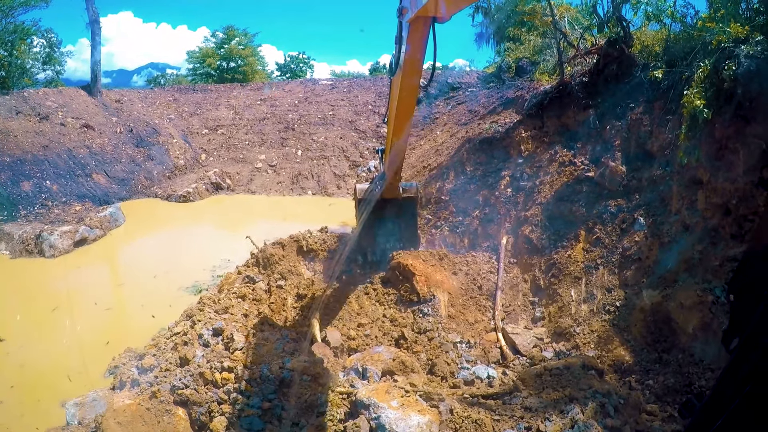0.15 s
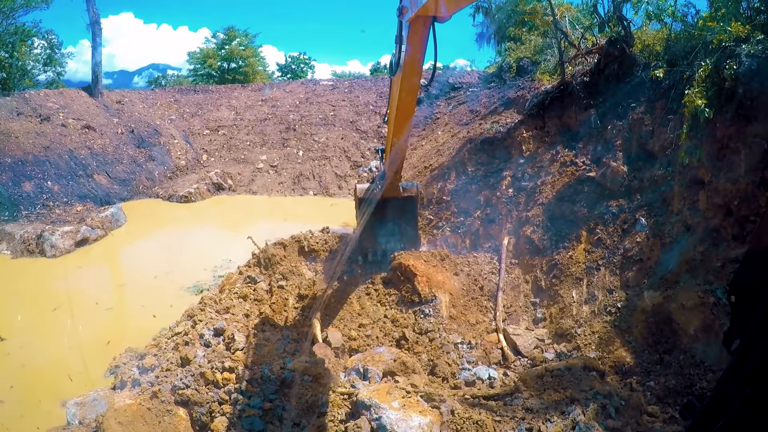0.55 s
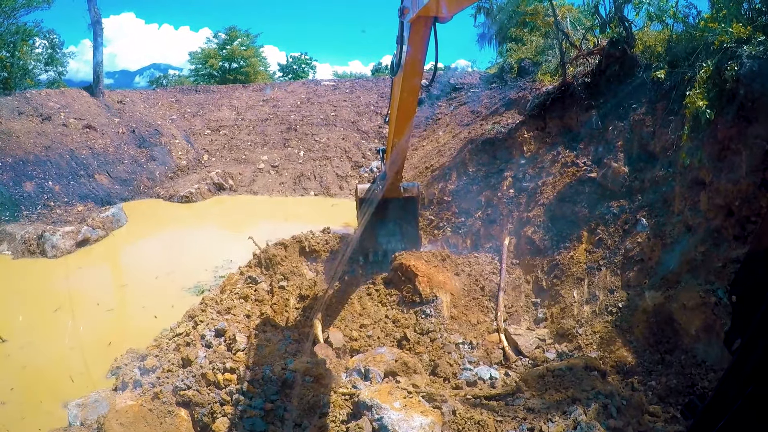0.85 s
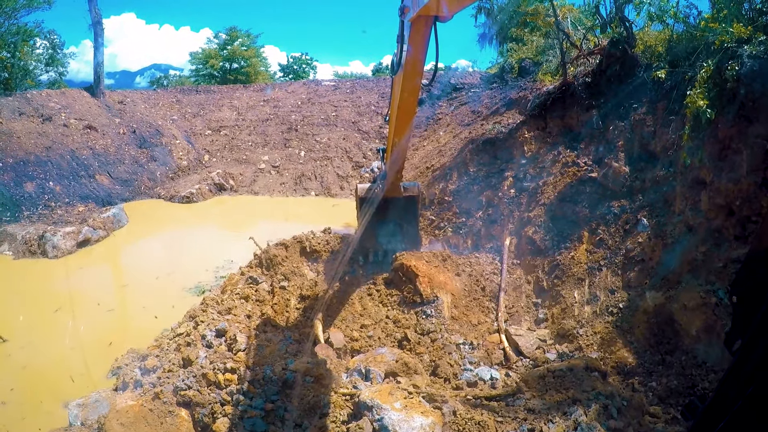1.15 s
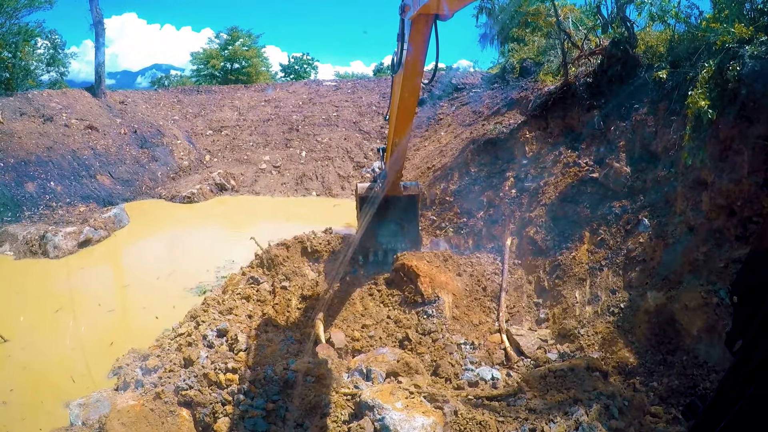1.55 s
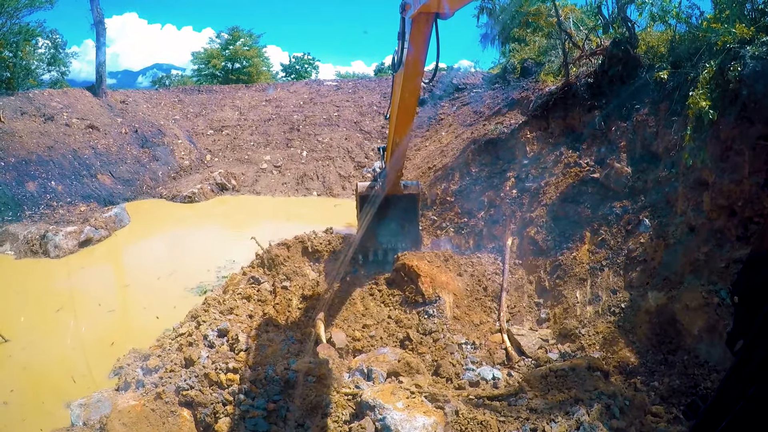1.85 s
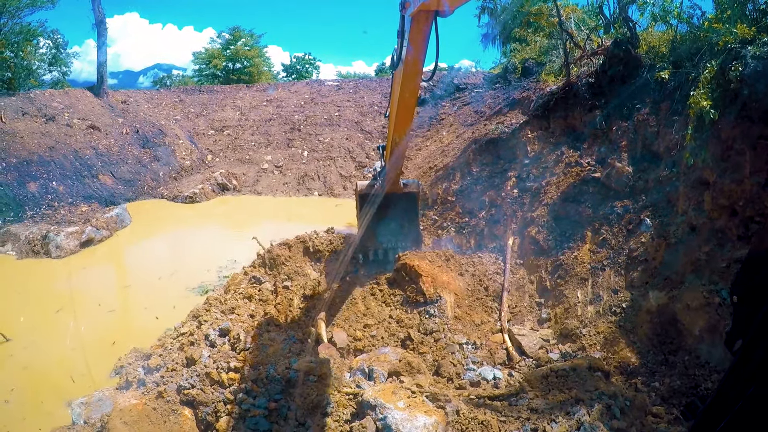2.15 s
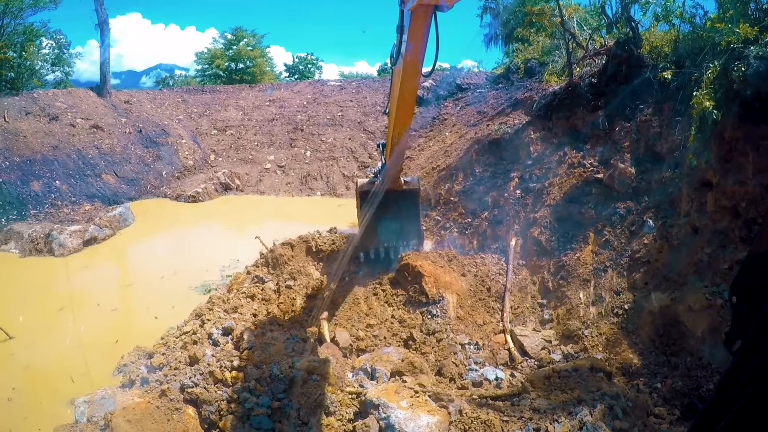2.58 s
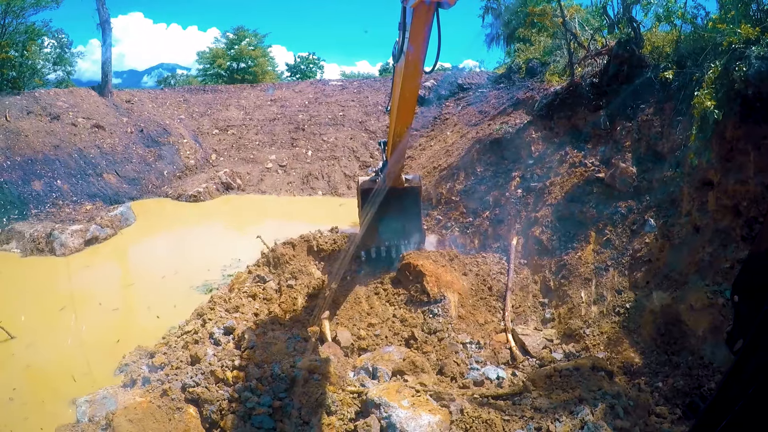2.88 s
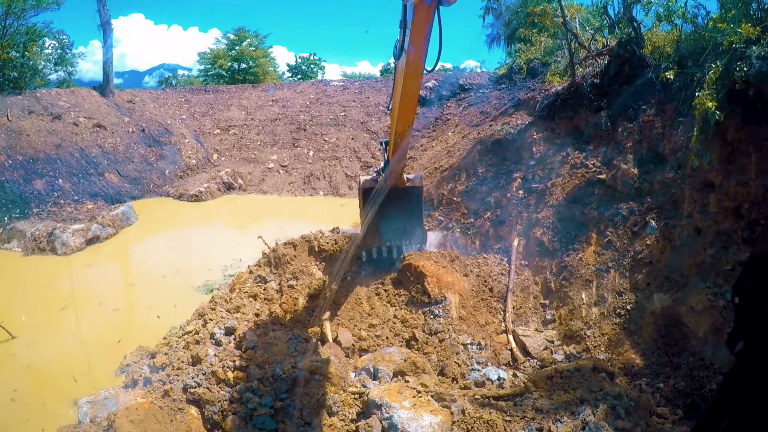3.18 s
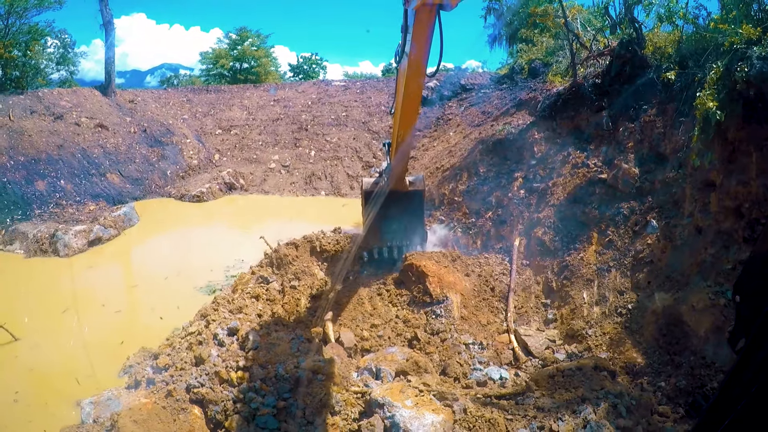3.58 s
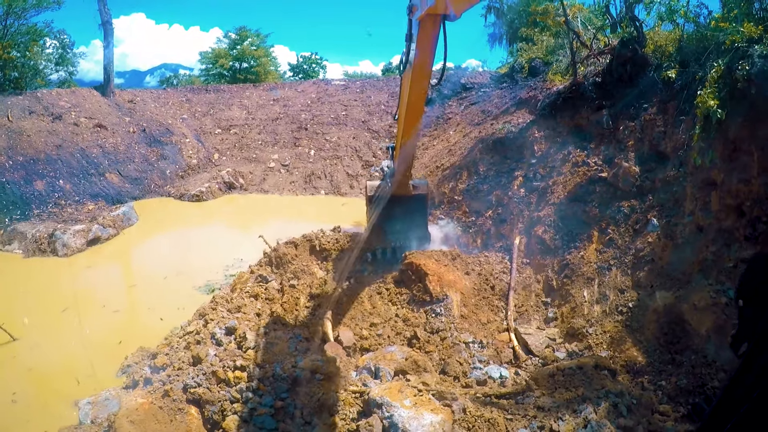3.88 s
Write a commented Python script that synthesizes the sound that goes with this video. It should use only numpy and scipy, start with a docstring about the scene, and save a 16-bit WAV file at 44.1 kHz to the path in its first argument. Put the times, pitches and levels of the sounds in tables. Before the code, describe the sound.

An excavator digs rocky ground outdoors, heard through the two ports of a camera clamped to its cab, so the bass is heavy and phasey. It opens with a deep sway and boom and a quick flurry of dry grit rattles in the first 0.3 s; a very faint thin squeal follows around 0.4-0.6 s. The boom eases while a low diesel hum, strongest near 0.9 s, and a hydraulic pump tone rise, holding to about 2.2 s. From 1.1 s the frame booms again in lumpy, overlapping tugs, with growl, faint hiss and sparse ticks. Scraping grows from 2.2 s; a soft steel knock lands at 2.8 s. The pump fades after 3.2 s. At 3.6 s a cluster of dull metallic knocks begins, climaxing in a very loud bang at 3.78 s with scrape and sharp grit. A tiny squeal and settling stones follow until the cut at 4 s.

```python
"""A deep sway and boom with a rattle of grit come first, then the engine hum rises: a crawler excavator digs
rocky ground, heard at close range through the two microphone ports of a camera clamped to its cab.
Filtered noise makes the frame boom and judder as the bucket drags, nearly in opposition at the ports through
much of the bass. Decaying noise and ticks rattle as grit close by; ringing steel modes knock on rock.
Behind them, the diesel and the hydraulic pump hum on multiples of one shaft, with two thin squeals."""
import sys
import numpy as np
from scipy.fft import rfft, irfft, next_fast_len
from scipy.io import wavfile
from scipy.ndimage import uniform_filter1d, minimum_filter1d, map_coordinates

SR = 44100
rng = np.random.default_rng(int(sys.argv[2]) if len(sys.argv) > 2 else 0)


def pcm_store(signal):
    """Save signal as 16-bit PCM."""
    levels = np.round(np.clip(np.atleast_2d(signal), -1, 1) * 32767)
    wavfile.write(sys.argv[1], SR, levels.astype(np.int16).T)


N = 177546

# Bucket teeth catching and letting go: peak_s, length_s, boom_db, scrape_db
TUG_SWELLS = [(0, 0.22, -21, -62.5), (0.387, 0.2, -26, -58.5), (1.125, 0.13, -18.5, -49.5),
              (1.282, 0.21, -21.5, -51.5), (1.545, 0.25, -27.5, -57), (1.905, 0.32, -23.5, -52),
              (2.246, 0.2, -19.5, -45), (2.709, 0.32, -23, -48.5), (2.841, 0.11, -19.5, -52),
              (3.093, 0.19, -19.5, -47.5), (3.52, 0.15, -32, -46), (3.623, 0.11, -22.5, -43.5),
              (3.721, 0.096, -26, -40), (3.777, 0.071, -20, -33.5)]
TUG_RISE = 0.43  # share of a tug's length before its peak
BOOM_REST_DB, SCRAPE_REST_DB = -30.5, -66.5  # between tugs
TUG_GROWL_DB = -16  # growl swelled by a tug, relative to the boom
# How hard the bucket drags: time_s, effort_db
DRAG_EFFORT = [(0, 0.5), (.36, -3), (1.12, 1.5), (1.5, -1.5), (1.9, 0.5), (2.5, -1.5), (3.36, -1.5),
               (3.6, 3), (3.785, 9.5), (3.93, -2), (4.03, 2)]
# Growl, judder and hiss, one row each: level_db at effort 0, growth_db per dB of effort
FRAME_LAYERS = [(-39, 1.41), (-49, 1.38), (-61.5, 1.5)]
# Frame resonances: pitch_hz, width_hz of one pass, level_db of one pass (the filter passes twice)
FRAME_MODES = [(89.95, 9.1, 0.5), (107.26, 8.1, -0.5), (120.7, 13.5, -1.5), (129.1, 16, -16.5),
               (81.3, 31, -9.5)]
# The cab rocking on its mounts: time_s, level_db
ROCKING_LEVEL = [(0, -14), (.3, -19.5), (1.3, -23), (2.5, -20), (3.0, -25), (3.55, -17.5), (3.75, -18.5),
                 (4.03, -24)]
# Noise colours, before scaling to rms 1: pitch_hz, density_db (relative, per Hz)
ROCKING_COLOUR = [(8, -25.5), (15, -7.5), (26, -2), (38, -2.5), (48, -20.5), (70, -8.5), (85, -25),
                  (160, -120)]
GROWL_COLOUR = [(88, -44.5), (150, 0), (226, -6.5), (264, -3.5), (351, -7), (397, -10), (420, -15),
                (450, -19.5), (580, -24.5), (990, -120)]
JUDDER_COLOUR = [(250, -41), (420, 1), (489, -4), (979, -15), (1080, -12), (1250, -16), (2600, -27),
                 (3380, -71.5), (5720, -120)]
HISS_COLOUR = [(1290, -37), (2200, -2), (2420, 1.5), (2520, -6.5), (2830, -2), (4790, -11), (6190, -5.5),
               (7000, -4), (8890, -16.5), (11600, -28.5), (19600, -120)]
RATTLE_COLOUR = [(1350, -19.5), (2300, -0.5), (3100, -5.5), (3400, -2), (3850, -5.5), (4800, -8.5),
                 (5140, -5), (6780, -1), (8890, -15), (11600, -25.5), (19600, -120)]
RATTLE_LOW_COLOUR = [(260, -35), (450, -0.5), (557, -2), (937, -7), (1290, -8), (1750, -9.5), (2600, -17.5),
                     (3380, -43.5), (5720, -120)]

# Bucket blows on rock: start_s, peak_db (nominal), upper_modes_db (relative)
BLOWS = [(2.806, -21.5, -16), (3.599, -19, -20), (3.612, -12.5, -21), (3.675, -17, -14), (3.716, -26, -8),
         (3.778, -3.5, -19), (3.797, -11, -24)]
# Modes of the boom and bucket steel: pitch_hz, level_db (relative), t60_s
STEEL_MODES = [(141, 1.5, 0.2), (192, -4.5, 0.29), (261, 12, 0.032), (327.3, 0.5, 0.17), (475, 5.5, 0.1),
               (694, 1, 0.064), (769.6, 4.5, 0.081), (901, -0.5, 0.16), (1040, -5.5, 0.069),
               (1195, 0.5, 0.13), (1305, -3.5, 0.084), (1426, 4, 0.096), (1560, -8.5, 0.03),
               (2055, -13, 0.065)]
RATTLE_CREST_DB, KNOCK_CREST_DB = 11, 12  # peak of a rattle over its rms, of a knock over one mode

# Grit rattles close by: start_s, peak_db (nominal), low_part_db (relative), t60_s,
# chip_hz of the loudest chip, chip_db (relative)
RATTLES = [(0.019, -37, -7.5, 0.1, 6160, 2.5), (0.053, -30.5, 2, 0.092, 7300, -2),
           (0.078, -42, 5.5, 0.15, 2300, 7), (0.0775, -46, -6, 0.13, 3530, 14),
           (0.1482, -37.5, 9, 0.11, 3180, 0), (0.252, -39, -5, 0.13, 2330, 0),
           (0.2726, -32, 5, 0.11, 7180, 2.5), (0.309, -43.5, 10, 0.14, 1298, 10.5),
           (0.575, -37.5, 2.5, 0.16, 2330, -11), (0.8828, -43, 2, 0.07, 5770, 0),
           (1.099, -40, -2.5, 0.084, 6070, -7), (1.938, -45.5, 7, 0.12, 7000, 0),
           (2.144, -55.5, 0, 0.16, 6850, 12), (2.279, -39.5, -2, 0.076, 6840, -6),
           (2.4323, -48, -6.5, 0.13, 2150, -1), (2.4894, -44.5, 6, 0.11, 6460, -12),
           (2.547, -46, -2, 0.036, 6070, 2), (2.671, -46.5, -2, 0.075, 3490, -15),
           (2.742, -38.5, -4.5, 0.13, 7350, -1), (2.967, -40, -0.5, 0.1, 7450, -2),
           (3.141, -42.5, -8, 0.1, 3320, -6.5), (3.2755, -39, 1.5, 0.072, 7400, -3),
           (3.512, -37.5, -5, 0.062, 7470, -5), (3.572, -48.5, 3.5, 0.126, 7190, 7),
           (3.5955, -37, 11.5, 0.083, 2045, 12), (3.651, -35, -21, 0.063, 6400, -8),
           (3.663, -43.5, 7, 0.35, 1353, 15.5), (3.6987, -50.5, 9, 0.043, 1280, 6),
           (3.757, -25.5, 1, 0.14, 7110, -6), (3.8433, -39, 3, 0.37, 7450, -11),
           (3.907, -39, 5.5, 0.036, 1290, 9), (3.9465, -34, -18, 0.054, 2380, 4.5),
           (3.959, -35.5, 3.5, 0.1, 7500, 2), (4.006, -42.5, 4.5, 0.067, 2350, 10)]
# Chips ringing in a rattle: pitch_hz, width_hz of one pass, level_db (relative)
CHIP_MODES = [(1300, 730, -11), (2210, 490, -1), (3620, 1100, -3.5), (4500, 550, -3.5), (6040, 540, 1.5),
              (7550, 490, 1.5)]
RATTLE_ATTACK_S, CHIP_Q = .0018, 6  # rise; chip pitch over its width
CHIP_FADES_DB, LOW_LINGERS_DB = 30, 12.5  # over one t60: extra fall of a chip's ring, lesser fall of the low part
CRACK_DB = 0.5  # nominal tick level over the rattle's gain
TICK_COLOUR = [(2000, -25), (7000, 7), (10000, 0), (13500, -6.5), (16000, -17.0)]  # pitch_hz, gain_db

# Engine speed: time_s, shaft_turns_per_s
SHAFT_SPEED = [(0, 29.25), (.6, 29.17), (1.4, 29.33), (2.2, 29.36), (3.2, 29.3), (4.03, 29.28)]
# Firing hum: time_s, level_db
FIRING_LEVEL = [(0, -60.5), (.2, -22), (.45, -27.5), (.93, -14), (1.31, -26.5), (1.68, -17.5), (2.15, -20),
                (2.41, -29.5), (3.0, -21.5), (3.2, -29), (3.42, -23.5), (3.64, -21.5), (4.03, -35.5)]
# Octave of the firing hum: time_s, level_db
OCTAVE_LEVEL = [(0, -36), (.4, -43.5), (1.0, -31), (1.5, -19), (1.8, -34), (2.1, -27.5), (2.6, -30.5),
                (3.2, -22), (3.6, -32.5), (4.03, -24)]
# Hydraulic pressure: time_s, pressure_db
HYDRAULIC_PRESSURE = [(0, -19.5), (.68, -9), (.86, 0.5), (1.2, 3.5), (1.4, -1), (1.7, 0), (2.2, 0.5),
                      (2.3, -11), (2.67, -4.5), (3.0, -6.5), (3.3, -15.5), (4.03, -22.5)]
# Other shaft multiples: multiple, level_db at pressure 0, port_phase_rad
SHAFT_ORDERS = [(1, -34.5, 10), (12, -44, -1.43)]
# Pump overtones from the second up: level_db (relative), port_phase_rad
PUMP_OVERTONES = [(-4.5, -0.5), (-0.5, 4), (2, 1.44), (-7, 2), (-2.5, -3.5), (-12, -3), (-18, -1)]
PISTONS = 9
PULSE_DB, WHINE_DB = -31.5, -56  # at pressure 0
PULSE_GROWS, WHINE_GROWS, GROWL_GROWS = 0.66, 1.02, 0.11  # dB per dB of pressure
ORDER_GROWS = 0.26  # the same for the twelfth shaft order, less for lower ones

# Thin squeals: start_s, end_s, pitch_hz, peak_db (nominal)
SQUEALS = [(0.364, 0.588, 6100, -68.5), (3.826, 3.89, 5350, -50)]

# Paths to the microphone ports: pitch_hz, likeness (0-1), right_phase_rad, left_over_right_db
SHARED_PATH = [(17, .89, .6, -6), (29, .4, -1.1, -3), (42, .2, -.5, -5), (75, .85, -2.3, -3),
               (92, .99, -2.5, -2.3), (125, .99, -2.72, -2.6), (180, .92, -2.8, -4), (238, .7, -3, -3),
               (326, .8, -4.5, -2), (435, 0.6, -6.5, -1), (610, 0.36, -4, -5), (1640, 0.44, -4, 0.5),
               (2100, 0.3, -8.5, 0), (5800, .45, -5, -2), (7000, 0.2, -1, 0.5), (9100, 0.3, 0.5, -1.5),
               (12000, .5, -5.5, 0.5)]
CLAMP_PATH = [(393, 0.92, -2, 1), (860, 0.95, -3, -0.5), (1510, 0.94, -2.5, 0.5), (1900, 0.5, -1.5, 0)]  # scraping, borne by the steel
KNOCK_PATH = [(130, 0.85, -4, -4), (300, 0.91, -1.9, -2.5), (900, 0.89, -3, 1)]
LIMIT, LIMIT_HOLD_S, TOP_HZ = .92, .012, 15800


def frame(boom_gain):
    """Noise-driven shaking of cab and frame; teeth catching on stones make it lumpy."""
    effort_db = curves(DRAG_EFFORT)[0]
    growl_gain, judder_gain, hiss_gain = (amp(db + grows * effort_db) for db, grows in FRAME_LAYERS)
    catch = wobble(21.98)
    boom = boom_gain * amp(0.9 * wobble(15)) * evened(resonant(FRAME_MODES))

    drag_growl = growl_gain * amp(GROWL_GROWS * curves(HYDRAULIC_PRESSURE)[0])
    tug_growl = boom_gain * amp(TUG_GROWL_DB)
    growl = np.hypot(drag_growl, tug_growl) * amp(1.3 * catch) * noise(GROWL_COLOUR)
    judder = judder_gain * amp(1.3 * catch + 0.74 * wobble(70)) * noise(JUDDER_COLOUR)

    ringing = amp(-15.5 + 1.5 * wobble(12)) * resonant(CHIP_MODES[-2:])
    hiss = hiss_gain * amp(0.78 * catch + 0.47 * wobble(5.7)) * (noise(HISS_COLOUR) + ringing)
    return rocking() + boom + growl + judder + hiss


def tugs():
    """Boom and scrape gains: a resting power plus one smooth swell for each tug."""
    t = np.arange(N) / SR
    power = amp([[2 * BOOM_REST_DB], [2 * SCRAPE_REST_DB]])
    for peak_s, length, *db in TUG_SWELLS:
        side = length * np.where(t < peak_s, TUG_RISE, 1 - TUG_RISE)
        power = power + amp(db)[:, None] ** 2 * np.exp(-2 * ((t - peak_s) / side) ** 2)
    return np.sqrt(power)


def rocking():
    """The cab's slow swing on its mounts, as low noise."""
    return amp(curves(ROCKING_LEVEL)[0]) * evened(noise(ROCKING_COLOUR))


def scrape(scrape_gain):
    """Dragging feeds uneven noise into the upper steel modes; the wider the mode, the shorter it rings."""
    # half the level, as the filter passes twice
    upper = [(hz, 9 / t60, db / 2) for hz, db, t60 in STEEL_MODES[4:]]
    return scrape_gain * amp(1.9 * wobble(45) + 2.0 * wobble(120)) * resonant(upper)


def knocks():
    """Each blow rings the steel modes with new strengths and slightly shifted pitches."""
    out = np.zeros((2, N + SR))
    t = np.arange(SR // 3) / SR
    hz, level_db, t60 = np.array(STEEL_MODES).T[:, :, None]
    attack = 1 - np.exp(-t / .002)
    for start, db, upper_db in BLOWS:
        strength, shift, phase = rng.standard_normal((3, 2, len(hz), 1))
        mode_db = db - KNOCK_CREST_DB + level_db + upper_db * (hz > 400) + 1.5 * strength
        gain = amp(mode_db - 60 * t / t60)
        ring = gain * np.sin(2 * np.pi * hz * (1 + .015 * shift) * t + .3 * phase) * attack
        out[:, round(start * SR):][:, :len(t)] += ring.sum(axis=1)
    return out[:, :N]


def grit():
    """Each rattle starts sharply, rings one chip loudest and dies in uneven grains; ticks fall throughout."""
    t = np.arange(SR // 3) / SR
    high, low = np.zeros((2, N + SR))
    ring = np.zeros((2, N + SR))
    waver = rng.standard_normal((len(RATTLES), 2, 2, SR // 50))
    attack = 1 - np.exp(-t / RATTLE_ATTACK_S)
    for (start, db, low_db, t60, chip_hz, chip_db), knots in zip(RATTLES, waver):
        fade = amp(db - RATTLE_CREST_DB - 60 * (t / t60) ** 1.44) * attack
        at = slice(round(start * SR), round(start * SR) + len(t))
        high[at] += fade
        low[at] += fade * amp(low_db + LOW_LINGERS_DB * t / t60)
        # slow random cosine and sine parts make a narrow band around the chip's pitch
        knot_at = [t * chip_hz / CHIP_Q + 2]
        c, q = [[map_coordinates(k, knot_at) for k in part] for part in knots]
        turn = 2 * np.pi * chip_hz * t
        chip_gain = fade * amp(chip_db - CHIP_FADES_DB * t / t60)
        ring[:, at] += chip_gain * (c * np.cos(turn) + q * np.sin(turn))
    high, low, ring = high[:N], low[:N], ring[:, :N]

    # each chip size rings on its own; big chips go with the low part
    chips = np.zeros((2, N))
    for hz, width, db in CHIP_MODES:
        part = low if hz < 4000 else high
        chips += amp(db - 13.0 + 2.2 * wobble(40)) * part * resonant([(hz, width, 0)])
    grain = amp(0.66 * wobble(260) + 1.1 * wobble(90))
    rattle = grain * (high * noise(RATTLE_COLOUR) + chips + ring + low * noise(RATTLE_LOW_COLOUR))
    return rattle + ticks(high)


def ticks(rattle_gain):
    """Random single impulses in clumps, stronger inside a rattle, coloured bright."""
    chance, size = rng.random((2, N))
    ticks_per_sample = 150 * amp(7 * wobble(7)) / SR
    gain = (amp(-52) + amp(CRACK_DB) * rattle_gain) * amp(-2 * np.log(size + 1e-2))
    return filtered((chance < ticks_per_sample) * gain, lambda hz: amp(along(TICK_COLOUR, hz)[0]))


def machine():
    """Firing hum, shaft orders, and the piston pump with its thin whine, all locked to one shaft."""
    turns = np.cumsum(curves(SHAFT_SPEED)[0]) / SR
    pressure_db = curves(HYDRAULIC_PRESSURE)[0]
    # two firings a turn, and their octave
    hum = amp(curves(FIRING_LEVEL)[0]) * tone(2 * turns, -0.71, 0.54, drift=0.21)
    hum += amp(curves(OCTAVE_LEVEL)[0]) * tone(4 * turns, -2.74, -1.5, drift=0.2)
    for k, db, phase in SHAFT_ORDERS:
        gain = amp(db + ORDER_GROWS * k / 12 * pressure_db + 3.3 * wobble(8.1))
        hum += gain * tone(k * turns, phase, 0.0, drift=0.32)

    strokes = PISTONS * turns
    whine = np.zeros((2, N))
    for k, (db, phase) in enumerate(PUMP_OVERTONES, 2):
        whine += amp(db + 1.9 * wobble(6.37)) * tone(k * strokes, phase, 1.1, drift=0.36)
    pulse = amp(1.5 * wobble(9)) * tone(strokes, 3.0, -5.5, drift=.12)
    pump = amp(PULSE_DB + PULSE_GROWS * pressure_db) * pulse
    return hum + pump + amp(WHINE_DB + WHINE_GROWS * pressure_db) * whine


def squeaks():
    """Narrow wavering tones from a rubbing joint, equal at both ports."""
    t, out = np.arange(N) / SR, np.zeros(N)
    for start, end, hz, db in SQUEALS:
        gate = np.clip(np.minimum(t - start, end - t) / 0.016, 0, 1)
        out += gate * amp(db + 4 * wobble(40)) * np.sin(2 * np.pi * hz * t + 1.0 * wobble(220))
    return out


def ports(shared, own, path):
    """Left and right from a shared and an unrelated signal; their mean keeps the given level."""
    def response(hz):
        like, phase, left_db = along(path, hz)
        g = amp(left_db / 2)
        mean = np.sqrt(g ** 2 + g ** -2 + 2 * like * np.cos(phase)) / 2
        turn = np.exp(.5j * phase)
        return np.array([g / turn, like * turn / g, np.sqrt(1 - like ** 2) / g]) / mean
    left, right, extra = filtered(np.array([shared, shared, own]), response)
    return np.array([left, right + extra])


def tone(cycles, phase, left_db, drift):
    """A sine at both ports, each drifting a little in phase."""
    slip = drift * np.array([wobble(2.37), wobble(3.32)])
    gain = np.sqrt(2) * amp([[left_db / 2], [-left_db / 2]])
    return gain * np.sin(2 * np.pi * cycles + slip + [[-phase / 2], [phase / 2]])


def evened(swing):
    """Evens out a noise's slow swells in level, then scales it to rms 1."""
    size = np.sqrt(uniform_filter1d(swing ** 2, size=SR // 10) + .05)
    return unit(swing / size ** .7)


def resonant(modes):
    """Two unrelated noises of rms 1, passed twice through resonances of (Hz, width Hz, dB)."""
    def response(f):
        total = 0
        for k, (centre, width, db) in enumerate(modes):
            damping = 1j * f * width
            total = total + (-1) ** k * amp(db) * damping / (centre ** 2 - f ** 2 + damping)
        return total ** 2
    return unit(filtered(rng.standard_normal((2, N)), response))


def noise(spectrum):
    """Two unrelated coloured noises of rms 1."""
    return unit(filtered(rng.standard_normal((2, N)), lambda hz: amp(along(spectrum, hz)[0])))


def filtered(x, response):
    """x times a complex response of frequency."""
    m = next_fast_len(N + 8192)
    return irfft(rfft(x, m) * response(np.fft.rfftfreq(m, 1 / SR)), m)[..., :N]


def wobble(rate):
    """A smooth random curve, rate knots a second."""
    knots = rng.standard_normal(int(N * rate / SR) + 4)
    return map_coordinates(knots, [np.arange(N) * rate / SR])


def curves(rows):
    """One value per sample for each column after the time."""
    s, *cols = np.transpose(rows)
    return [np.interp(np.arange(N) / SR, s, c) for c in cols]


def along(points, hz):
    """Columns of (Hz, value, ..) points on a log axis."""
    f, *cols = np.transpose(points)
    return [np.interp(np.log(hz + 1), np.log(f + 1), c) for c in cols]


def amp(db):
    """dB to gain."""
    return 10 ** (np.asarray(db) / 20)


def unit(x):
    """Scaled to rms 1."""
    return x / np.sqrt(np.mean(x ** 2) + 1e-20)


def scene():
    """Scrape comes up the clamp, knocks by their own path, frame and grit by another; tones go direct."""
    boom_gain, scrape_gain = tugs()
    shaking = ports(*(frame(boom_gain) + grit()), SHARED_PATH)
    steel = ports(*scrape(scrape_gain), CLAMP_PATH) + ports(*knocks(), KNOCK_PATH)
    return shaking + steel + machine() + squeaks()


def record(dry):
    """A limiter turns both channels down around the highest peaks; nothing is kept above the band limit."""
    span = round(LIMIT_HOLD_S * SR)
    needed = np.minimum(1, LIMIT / (np.abs(dry).max(axis=0) + 1e-9))
    gain = uniform_filter1d(minimum_filter1d(needed, size=2 * span), size=span)
    return filtered(dry * gain, lambda hz: hz < TOP_HZ)


dry = scene()
out = record(dry)
pcm_store(out)
```